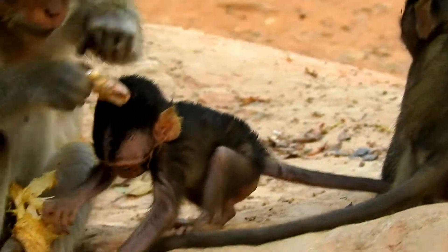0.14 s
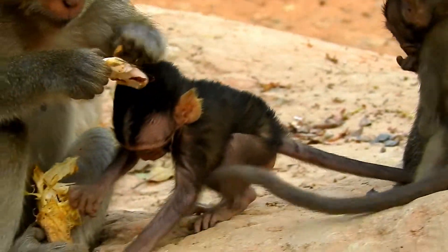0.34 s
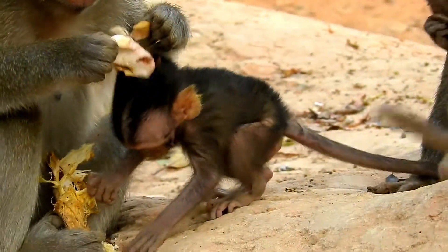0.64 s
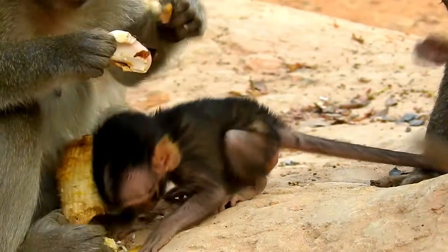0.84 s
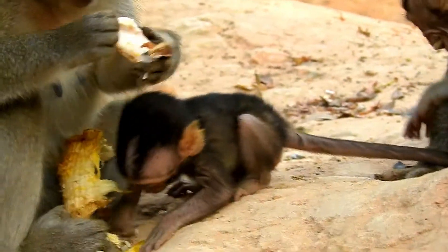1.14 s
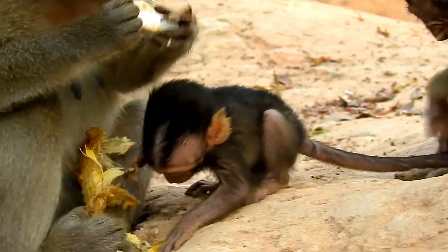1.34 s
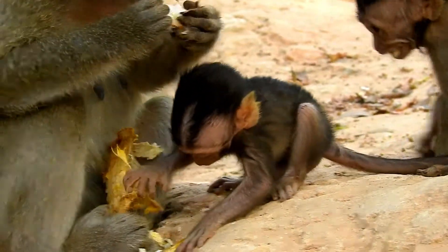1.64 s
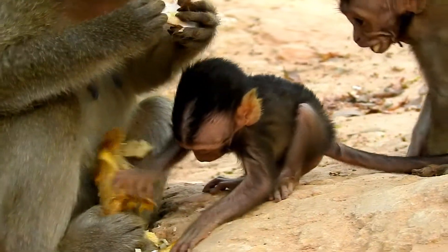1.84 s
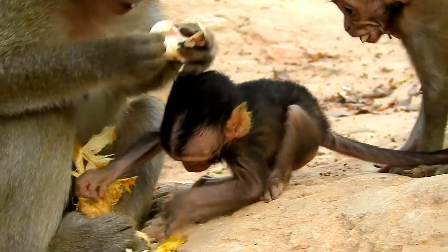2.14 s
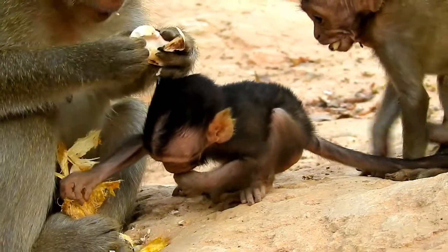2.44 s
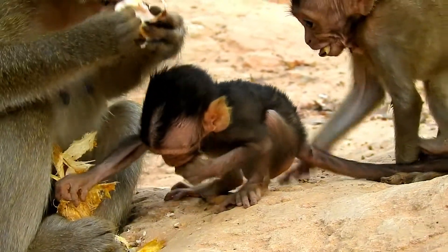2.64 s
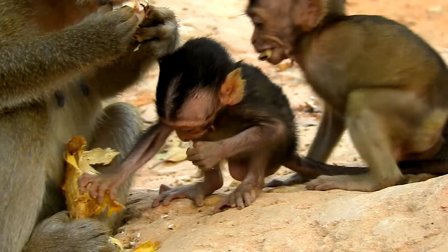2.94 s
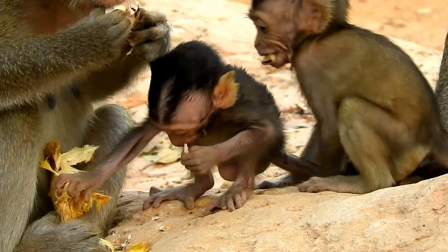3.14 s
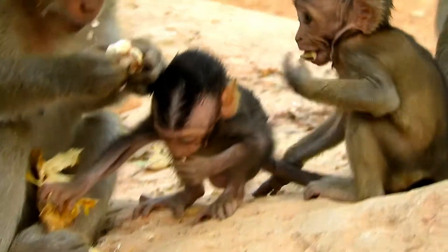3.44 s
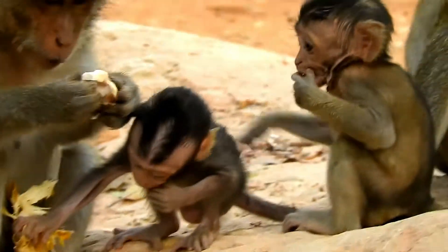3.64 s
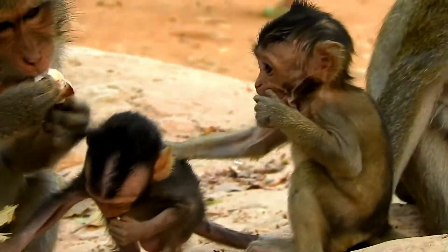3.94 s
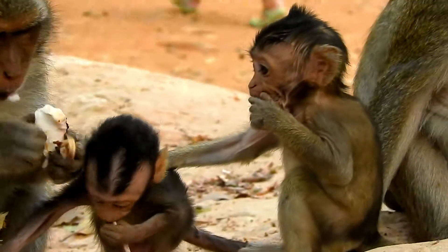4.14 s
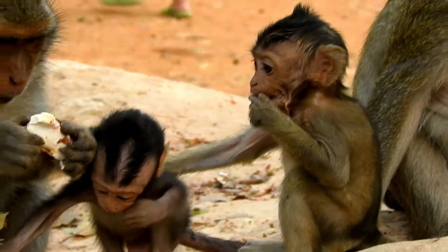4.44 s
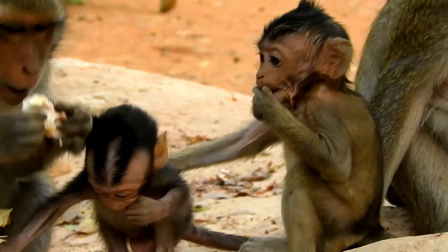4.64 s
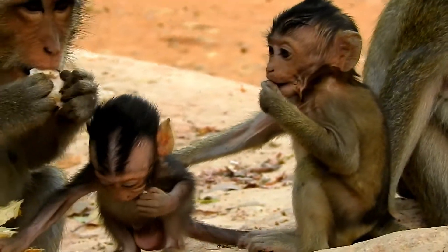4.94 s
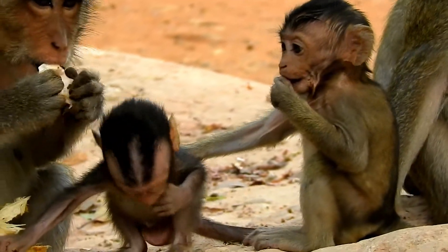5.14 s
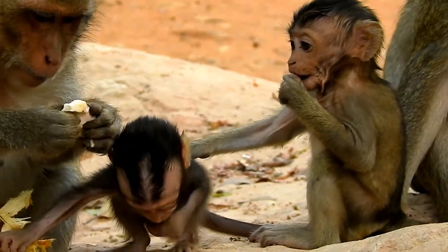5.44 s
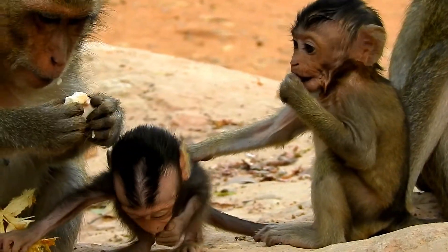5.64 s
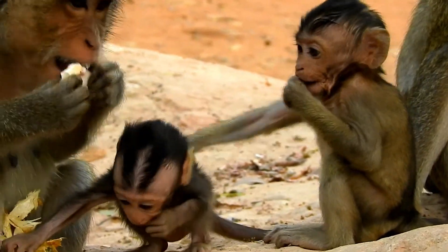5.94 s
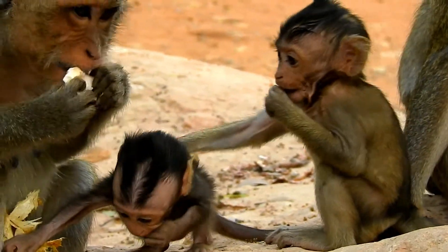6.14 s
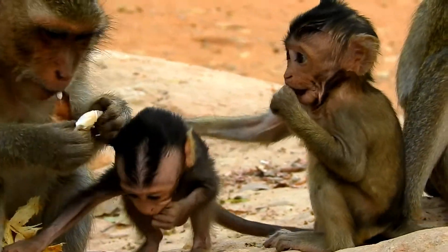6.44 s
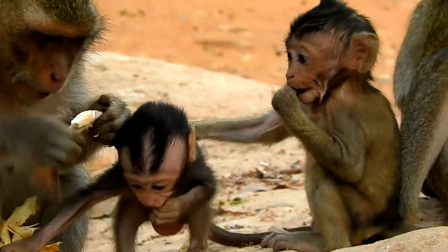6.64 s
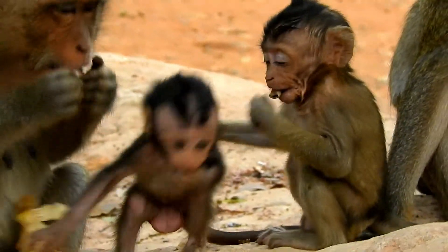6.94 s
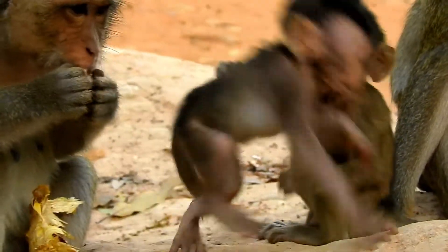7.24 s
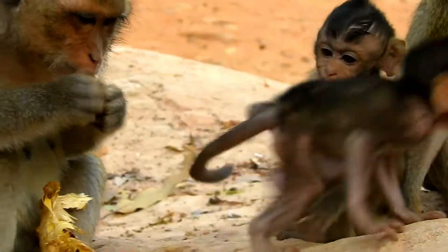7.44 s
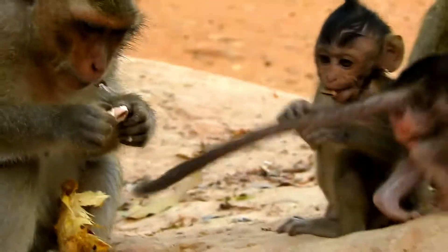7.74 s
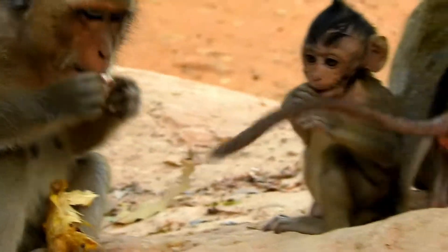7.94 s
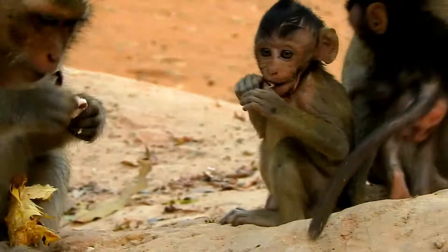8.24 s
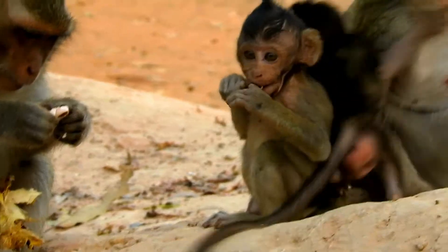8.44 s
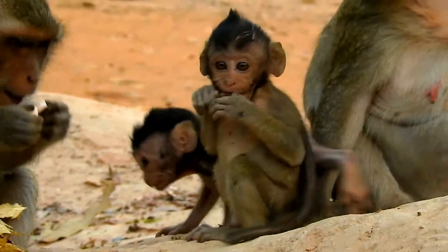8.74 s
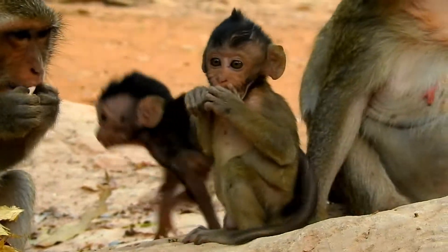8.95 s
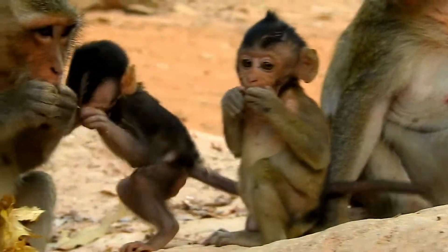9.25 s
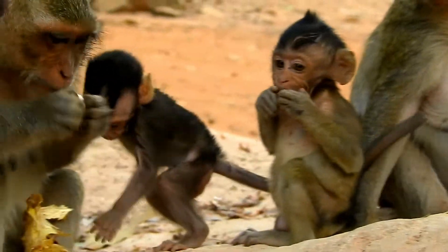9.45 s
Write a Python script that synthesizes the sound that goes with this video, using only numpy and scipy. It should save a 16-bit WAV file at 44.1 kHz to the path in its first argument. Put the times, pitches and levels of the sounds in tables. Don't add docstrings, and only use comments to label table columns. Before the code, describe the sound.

For nearly ten seconds, a cicada sings without a break: a hard, buzzy, high whine with strong pitches near 2.7 and 5.5 kilohertz, its pitch wavering slightly about three times a second. Tree echoes, a blurred far chorus and faint shrill insects surround it, leaning left. Distant traffic makes a low rumble and soft broad hiss. A slow single-cylinder engine is barely present at first, putters up around 3 seconds, eases at 4.5, then steadily approaches with tyre noise, strongest at the end. Short falling bird whistles come at 0.9, faintly at 2.0, at 3.9, loudest and highest at 6.0, and faintly at 7.7, ringing in the distance. Monkeys scuff dry husks and sand in crisp bursts at 1.1-1.7, duller scrapes at 6.8-7.4, a soft brush at 8.4 and a sharp tick-like scuff at 8.8.

```python
import sys
import numpy as np
from scipy import signal
from scipy.fft import rfft, irfft, next_fast_len
from scipy.io import wavfile
from scipy.ndimage import uniform_filter1d, map_coordinates

SR = 44100
rng = np.random.default_rng(int(sys.argv[2]) if len(sys.argv) > 2 else 0)


def attenuation_scalar(level_db):
    decades = np.asarray(level_db, float) / 20
    return 10 ** decades


def bounce(signal):
    frames = np.transpose(np.atleast_2d(signal))
    limited = np.clip(frames, -1, 1)
    pcm = np.round(limited * 32767).astype(np.int16)
    wavfile.write(sys.argv[1], SR, pcm)


N = 423360
PHRASE_S = 0.6775

OVERTONES_DB = [-54, -57, -26.5, -51.5, -53.5, -53.5, -45.5, -18, -36, -39.5, -49, -45.5, -32, -51.5, -60.5,
                -82, -65.5, -55, -92, -82, -96, -90, -78]
# (frequency [Hz], likeness)
TREES_ALIKE = [(2000, 0.69), (2740, 0.87), (5480, 0.35), (8200, 0), (11000, 0)]
# (frequency [Hz], likeness)
AIR_ALIKE = [(30, .988), (80, .9965), (170, .998), (350, .99), (700, .95), (1400, .86), (3000, .7),
             (5000, .45), (9000, .2)]
# (time [s], firing rate [1/s], level [dB])
ENGINE = [
    (0, 19.2, -50),
    (3, 15.2, -32),
    (4.5, 17.3, -39),
    (5.5, 18, -33.5),
    (6.8, 17.9, -28.5),
    (7.2, 17.8, -27),
    (7.6, 16.2, -25),
    (8.6, 18.44, -23.5),
    (9.6, 19, -21.5),
]


def unit(x):
    return x / np.sqrt(np.mean(x ** 2) + 1e-20)


def along(points, hz):
    f, v = np.transpose(points)
    return np.interp(np.log(hz + 1), np.log(f + 1), v)


def curves(rows):
    s, *columns = np.transpose(rows)
    return [np.interp(np.arange(N) / SR, s, column) for column in columns]


def wobble(rate_hz):
    knots = rng.standard_normal(int(N * rate_hz / SR) + 4)
    return map_coordinates(knots, [np.arange(N) * rate_hz / SR])


def filtered(x, response):
    m = next_fast_len(x.shape[-1] + SR // 2)
    return irfft(rfft(x, m) * response(np.fft.rfftfreq(m, 1 / SR)), m)[..., :x.shape[-1]]


def spread(pair, alike):
    def mid_side(hz):
        turn = np.arccos(np.clip(along(alike, hz), -1, 1)) / 2
        return np.array([np.cos(turn), np.sin(turn)])
    mid, side = filtered(pair, mid_side)
    return np.array([mid + side, mid - side])


def echoes(x, decay):
    hz, t, z = signal.stft(rng.standard_normal((2, SR)), SR, nperseg=256)
    dying = z * attenuation_scalar(-60 * t / along(decay, hz)[:, None])
    tail = spread(signal.istft(dying, SR, nperseg=256)[1], TREES_ALIKE)
    return signal.oaconvolve(x[None], tail / np.linalg.norm(tail[0]), axes=1)[:, :len(x)]


def click_rate():
    # (time [s], click rate [Hz])
    turning_points = [
        (.003, 543.65),
        (.0755, 549.45),
        (.102, 547.95),
        (.135, 550.35),
        (.2255, 545.65),
        (.2805, 550.05),
        (.34175, 543.65),
    ]
    drift_hz, drift_start_s = 1.4, 0.12
    s, hz = np.transpose(turning_points)
    t = np.arange(N) / SR
    place = np.interp((t - s[0]) % (PHRASE_S / 2) + s[0], s, np.arange(len(s)))
    whole = np.minimum(place.astype(int), len(s) - 2)
    ease = np.sin(np.pi / 2 * (place - whole)) ** 2
    rate_hz = hz[whole] + (hz[whole + 1] - hz[whole]) * ease
    return rate_hz + drift_hz * np.sin(2 * np.pi * (t - drift_start_s) / PHRASE_S)


def song(rate_hz):
    halfway_db = [-50.5, -72, -85, -76, -94, -48, -52, -55, -71, -75, -71, -67, -74, -80]
    turn = np.arange(8193) / 8192
    lines = [(2 * k + 6, db) for k, db in enumerate(OVERTONES_DB)]
    lines += [(2 * k + 11, db) for k, db in enumerate(halfway_db)]
    shape = sum(attenuation_scalar(db) * np.sin(2 * np.pi * (k * turn + rng.random())) for k, db in lines)
    return np.interp(np.cumsum(rate_hz) / (2 * SR) % 1, turn, unit(shape))


def chorus(hz):
    # (click rate [Hz], level [dB])
    singers = [(500, -38), (518, -18), (530, -14), (536, -18), (540, -2.5), (545, 2), (549, -4), (553, -2),
               (557, -24.5), (565, -16), (590, -60)]
    rate_hz, db = np.transpose(singers)
    power = 0
    for k, level_db in enumerate(OVERTONES_DB, start=3):
        power = power + attenuation_scalar(level_db + np.interp(hz / k, rate_hz, db, -150, -150)) ** 2 / k
    return np.sqrt(power)


def cicadas():
    # (time [s], level [dB])
    effort = [(0, -22), (1.3, -23), (2.1, -22), (3.6, -22.5), (5.1, -22), (6.7, -22), (7.4, -22),
              (8.2, -22), (9.6, -20.5)]
    # (frequency [Hz], t60 [s])
    tree_decay = [(2000, 0.3), (6000, 0.44), (12000, 0.59)]
    # (frequency [Hz], left minus right [dB])
    song_side = [(2740, 2.5), (5480, 4.5), (8200, 5), (11000, 0)]
    # (band top [Hz], swell [dB])
    band_swell = [(4100, .4), (7000, 1.8), (9700, -2.6), (30000, -5)]
    t = np.arange(N) / SR

    voice = song(click_rate() + 0.3 * wobble(30))
    sway = 2 * np.pi * 0.6003 * t + wobble(1.281)
    near = attenuation_scalar(-2) * voice + np.cos(sway) * echoes(voice, tree_decay) + np.sin(sway) * echoes(voice, tree_decay)
    far = unit(spread(filtered(rng.standard_normal((2, N)), chorus), TREES_ALIKE))
    both = filtered(near + attenuation_scalar(-2.5) * far, lambda f: attenuation_scalar(np.outer([0.5, -0.5], along(song_side, f))))

    tops_hz, swell_db = np.transpose(band_swell)
    band_numbers = np.arange(len(tops_hz))[:, None, None]
    bands = filtered(both[None], lambda f: np.searchsorted(tops_hz, f) == band_numbers)
    beat = np.cos(2 * 2 * np.pi * t / PHRASE_S - 0.7)
    low, *rest = bands * attenuation_scalar(np.outer(swell_db, beat))[:, None]

    level_db, = curves(effort)
    low_db = -1.5 - 1.43 * (level_db - level_db.mean()) + 0.42 * wobble(2.563)
    fade_start_s, fade_db_per_s = 8.83, -3.5
    low_db = low_db + fade_db_per_s * np.maximum(t - fade_start_s, 0)
    return attenuation_scalar(level_db) * (sum(rest) + low * attenuation_scalar(low_db))


def far_insects():
    # (centre [Hz], width [Hz], level [dB])
    shrill = [(9380, 64, -57.5), (12120, 70, -64.5), (13300, 55, -68), (6200, 13, -86)]
    left_minus_right_db = 6
    total = np.zeros((2, N))
    for hz, width_hz, db in shrill:
        band = filtered(rng.standard_normal((2, N)), lambda f: np.exp(-((f - hz) / width_hz) ** 2))
        total += attenuation_scalar(db + 3.1 * wobble(4)) * unit(band)
    return spread(total, TREES_ALIKE) * attenuation_scalar(np.outer([0.5, -0.5], left_minus_right_db))


def rush(spectrum, patchy_db):
    z = signal.stft(rng.standard_normal((2, N)), nperseg=512)[2]
    field = uniform_filter1d(rng.standard_normal(z.shape[1:]), size=6, axis=0)
    field = uniform_filter1d(field, size=14, axis=1)
    pair = signal.istft(z * attenuation_scalar(patchy_db * unit(field)), nperseg=512)[1][:, :N]
    return unit(spread(filtered(pair, lambda hz: attenuation_scalar(along(spectrum, hz))), AIR_ALIKE))


def traffic():
    # (frequency [Hz], density [dB/Hz])
    rumble = [(12, -66), (20, -36), (27, -30), (35, -23), (53, -4), (123, 0), (145, 0), (182, -5.5),
              (242, -6), (398, -20.5), (500, -43.5), (650, -27), (1100, -120)]
    # (frequency [Hz], density [dB/Hz])
    hiss = [(300, -33), (450, 0), (800, -1.5), (1500, -4.5), (2300, -7.5), (3600, -11.5), (5000, -6.5),
            (6500, -7.5), (8000, -12.5), (9500, -46), (11000, -75), (14000, -100)]
    # (frequency [Hz], density [dB/Hz])
    tyre_noise = [(250, -60), (380, 0), (520, 0), (800, -7.5), (1600, -13.5), (4000, -16), (8000, -31),
                  (10000, -120)]
    swell = attenuation_scalar(0.3 * wobble(2.94))
    _, thump_db = curves(ENGINE)
    tyres = attenuation_scalar(thump_db - 14) * rush(tyre_noise, patchy_db=2.0)
    roads = attenuation_scalar(-27) * swell * rush(rumble, patchy_db=0.94) + attenuation_scalar(-39) * rush(hiss, patchy_db=1.3)
    return roads + tyres


def ringing(x, modes):
    def response(f):
        total = 0
        for k, (hz, width_hz, db) in enumerate(modes):
            damping = 1j * f * width_hz
            total = total + (-1) ** k * attenuation_scalar(db / 2) * damping / (hz * hz - f * f + damping)
        return total ** 2
    return unit(filtered(x, response))


def engine():
    # (frequency [Hz], width [Hz], level [dB])
    pipe = [(67.4, 41, -10.5), (131, 36.5, -1), (226, 40, -9.5)]
    # (frequency [Hz], width [Hz], level [dB])
    outlet = [(322.1, 36.7, 2.5), (452, 33, -23.5)]
    rate_hz, thump_db = curves(ENGINE)
    turn_s, turn_length_s = 3.68, 2
    hidden = 1 / (1 + np.exp(2 * (np.arange(N) / SR - turn_s) / turn_length_s))
    bark_db = -35 - 20 * hidden
    cycles = np.cumsum(rate_hz * (1 + 0.012 * wobble(12))) / SR + 0.3
    fired = np.flatnonzero(np.diff(np.floor(cycles)))
    puffs = np.zeros(N)
    puffs[fired] = attenuation_scalar(1.85 * rng.standard_normal(N)[fired])
    exhaust = attenuation_scalar(thump_db) * ringing(puffs, pipe) + attenuation_scalar(bark_db) * ringing(puffs, outlet)
    return exhaust + attenuation_scalar(-29) * np.outer([1, -1], np.roll(exhaust, 900))


def bird():
    # (time [s], start [Hz], end [Hz], glide [s], level [dB])
    whistles = [
        (.855, 3280, 2200, .16, -42.5),
        (1.958, 2600, 1990, .14, -57),
        (3.875, 2800, 1960, .15, -47),
        (5.955, 3650, 2175, .135, -39.5),
        (7.671, 2498, 2020, .12, -53),
    ]
    # (frequency [Hz], t60 [s])
    valley_decay = [(2030, .8), (2170, 2.1), (3000, 1.4)]
    hold_s, attack_s, release_s, echo_delay_s = 0.045, 0.005, 0.075, 0.03
    straight, sent = np.zeros((2, N + SR))
    loudest_db = max(row[-1] for row in whistles)
    for s, top_hz, end_hz, glide_s, db in whistles:
        t = np.arange(int((glide_s + hold_s) * SR)) / SR
        above_hz = (top_hz - end_hz) * np.clip(1 - t / glide_s, 0, 1) ** 2.5
        shape = np.clip(np.minimum(t / attack_s, (t[-1] - t) / release_s), 0, 1)
        note = shape * np.sin(2 * np.pi * np.cumsum(end_hz + above_hz) / SR)
        straight[round(s * SR):][:len(t)] += attenuation_scalar(db) * note
        echo_db = -31 + 0.75 * (db - loudest_db) - 9 * above_hz / 1000
        sent[round((s + echo_delay_s) * SR):][:len(t)] += attenuation_scalar(echo_db) * note
    flutter = attenuation_scalar(4.5 * wobble(57))
    return straight[:N] * flutter + echoes(sent[:N], valley_decay)


def scuffs():
    # (time [s], length [s], peak [dB], centre [Hz], width [octaves])
    scrapes = [(1.08, .6, -39, 3000, 1.1), (6.8, .6, -34.5, 1300, 0.8), (1.098, 0.14, -24.5, 3500, 1.3),
               (1.124, .03, -29, 1350, 0.22), (1.222, 0.073, -28.5, 3000, 1.5),
               (1.453, 0.1, -26, 3500, 1.3), (1.527, 0.068, -28.5, 1690, 0.72),
               (1.56, .03, -29, 4500, 0.51), (1.595, 0.027, -30, 1050, .4), (1.631, 0.028, -25, 4200, 0.87),
               (6.813, 0.19, -26, 1400, 0.96), (6.972, 0.12, -28, 1400, 1.8), (7.12, 0.087, -29, 1200, 1.4),
               (7.178, .012, -25, 900, 0.58), (7.28, 0.056, -30, 1300, 1.1), (7.35, .06, -33, 900, .5),
               (8.441, 0.095, -38, 3015, 1.05), (8.829, 0.025, -21, 3160, 1.1), (8.9, 0.11, -31, 4014, 1.2)]
    out = np.zeros((2, N + SR))
    for s, length_s, db, hz, octaves in scrapes:
        u = np.arange(int(1.5 * length_s * SR)) / (length_s * SR)
        draw = rng.standard_normal((3, SR))[:, :len(u)]
        grains = unit(uniform_filter1d(draw[2], size=90))
        grit = attenuation_scalar(2.4 * grains) * draw[:2]
        colour = lambda f: np.exp(-np.log2((f + 1) / hz) ** 2 / (2 * octaves ** 2))
        envelope = 6 * u * np.exp(-3.2 * u ** 1.71) / 2
        out[:, round(s * SR):][:, :len(u)] += attenuation_scalar(db) * envelope * unit(filtered(grit, colour))
    return spread(out[:, :N], AIR_ALIKE)


def scene():
    # (frequency [Hz], gain [dB])
    microphone = [(20, -20), (45, -1.5), (7500, -2), (9500, -18), (12000, -40), (16000, -60)]
    broad = filtered(engine() + scuffs(), lambda hz: attenuation_scalar(along(microphone, hz)))
    return cicadas() + far_insects() + traffic() + bird() + broad


def top_cut(x):
    return signal.sosfilt(signal.butter(12, 14900, fs=SR, output="sos"), x)


def record(dry):
    return top_cut(dry)


dry = scene()
out = record(dry)
bounce(out)
```